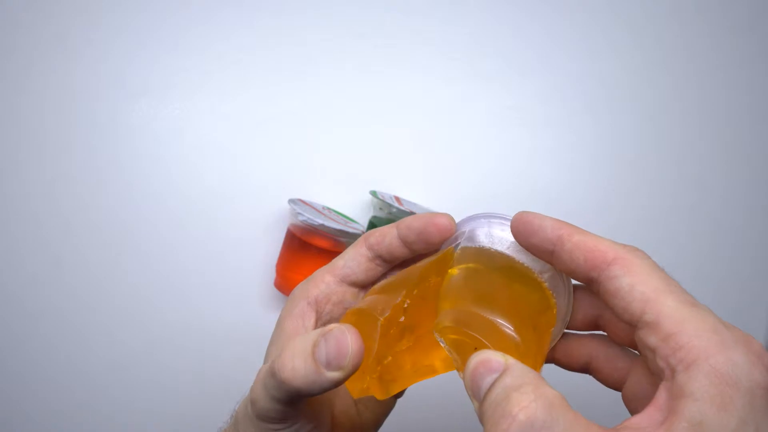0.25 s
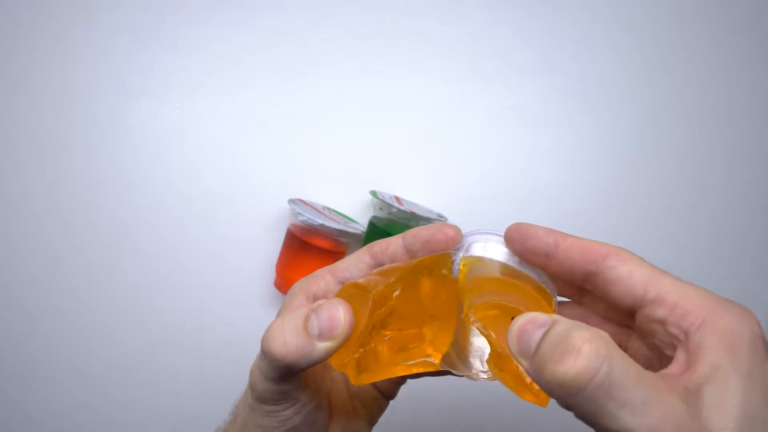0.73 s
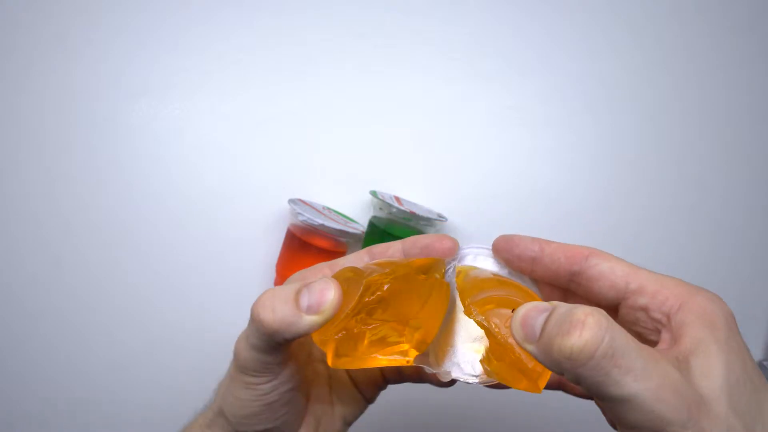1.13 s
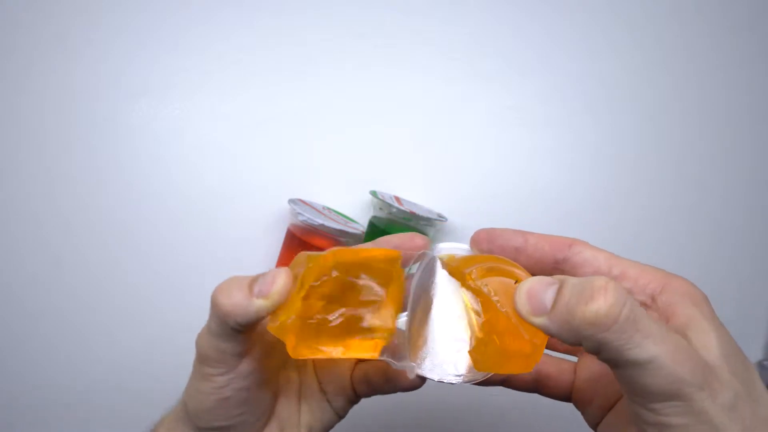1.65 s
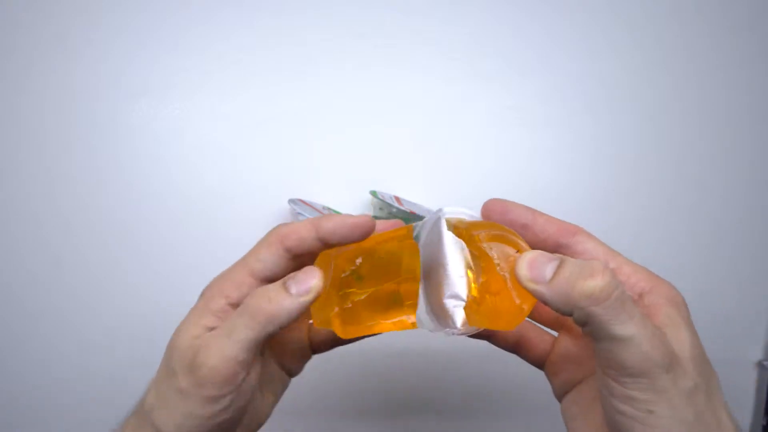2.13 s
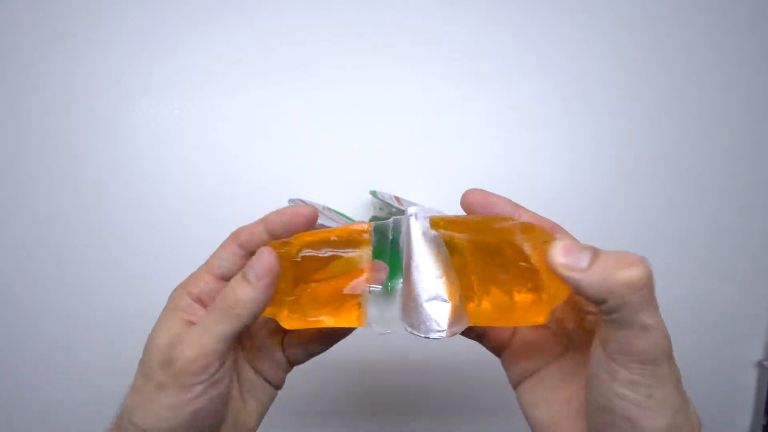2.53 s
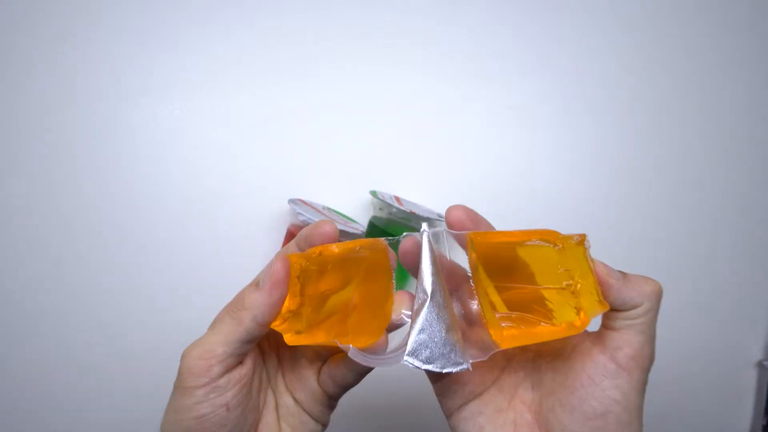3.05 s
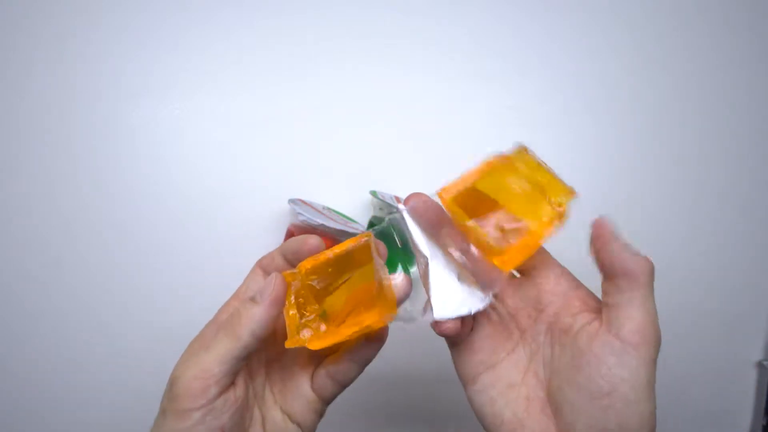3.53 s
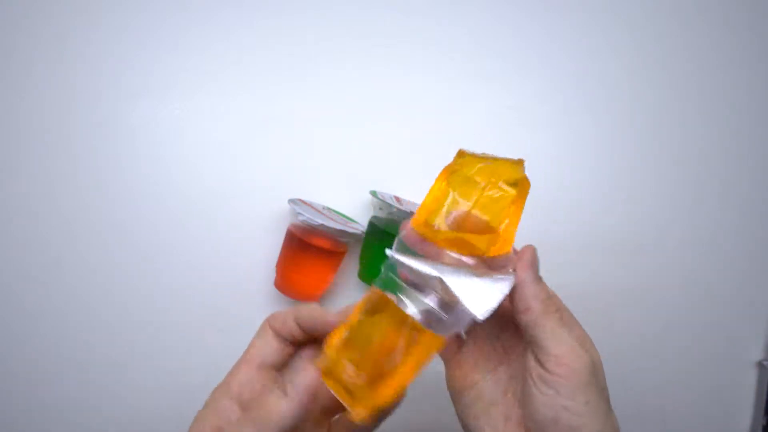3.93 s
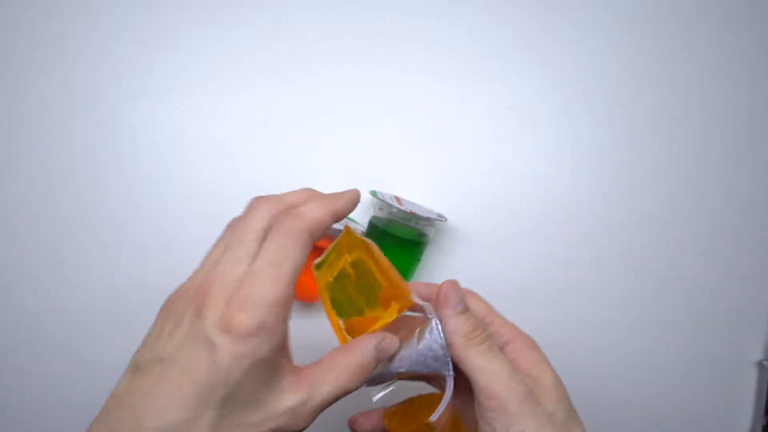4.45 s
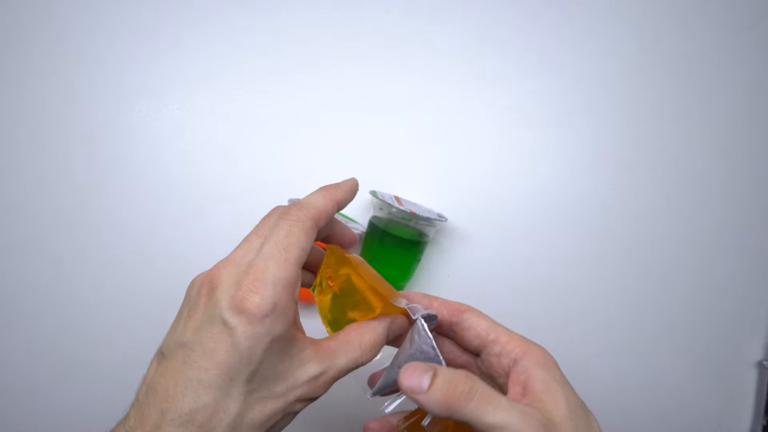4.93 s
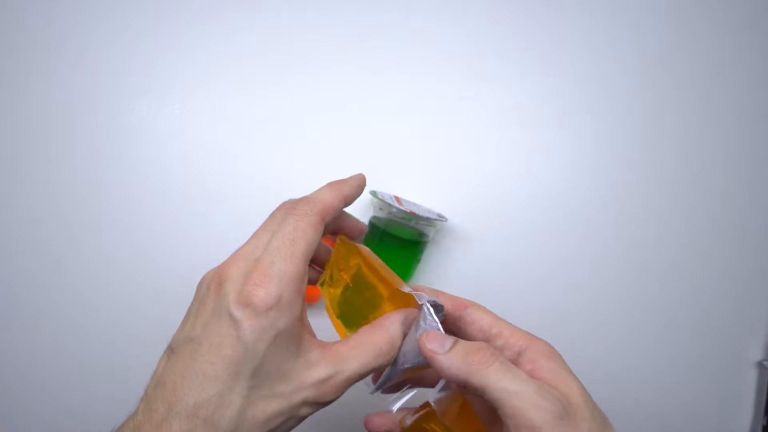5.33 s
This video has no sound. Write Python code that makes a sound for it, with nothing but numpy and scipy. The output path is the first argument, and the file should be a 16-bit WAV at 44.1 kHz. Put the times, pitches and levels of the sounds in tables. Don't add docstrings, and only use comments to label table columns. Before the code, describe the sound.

Close, harsh plastic buckling cracks clip and distort, followed by dense foil lid rustling, small ticks and a last burst of snaps.

```python
import sys
import numpy as np
from scipy import signal
from scipy.fft import rfft, irfft
from scipy.io import wavfile
from scipy.ndimage import uniform_filter1d

SR = 44100
rng = np.random.default_rng(int(sys.argv[2]) if len(sys.argv) > 2 else 0)


def inscribe(sig):
    pcm = np.round(np.clip(np.atleast_2d(sig).T, -1, 1) * 32767)
    wavfile.write(sys.argv[1], SR, pcm.astype(np.int16))


def gain_from_db(level_db):
    decades = np.asarray(level_db, float) / 20
    return 10 ** decades


N = 246060
T = np.arange(N) / SR
SHIELD_DB = -8
PURE_DB = -42

# start_s, peak_db, pitch_hz, crack_over_ring_db, overload_db
BANGS = [
    (0.117, 13.2, 2531, 10, 14.75),
    (1.506, 14, 1994, 19, 17.1),
    (1.517, 6, 2350, 2, 20.2),
    (2.715, 6.6, 2250, 4, 2.6),
    (4.722, 9.7, 2595, 1.5, 2.6),
]
# start_s, peak_db, pitch_hz, crack_over_ring_db, overload_db
SNAPS = [(1.879, 1, 3530, -5, 0.5), (1.881, -4, 1510, -22, -4.5), (3.088, 4, 2810, 3, -14),
         (4.535, 0.5, 3420, -17, -1), (4.611, 3, 2570, -6, -10), (4.647, -8, 2060, -8, -8),
         (4.657, 5, 2386, -2, 6.5), (5.442, 5, 2417, -1.5, -4.5), (5.457, -1, 2310, -13, -4),
         (5.544, 5.5, 2240, 0, 3.5), (5.554, 6, 4230, 9.5, 7)]
# start_s, peak_db, crack_over_ring_db, overload_db
WALL_SNAPS = [(0.734, 3.5, 16, -2), (0.742, -0.5, -1, -6), (0.756, 5.5, -2, -23), (0.762, -0.5, 6, -13),
              (0.898, -7, 13, -15), (0.9, 3, 8, -4), (0.909, 2.5, -4, -7), (0.964, -4, -1, -18),
              (0.976, -8, -2, -25), (1.19, 2, 13, -8.5), (1.278, -1.5, 1, 1), (1.332, 3.5, 8, -4)]
# pitch_hz, level_db (per Hz)
CRACK = [(88, -54), (150, -121), (547, -12.5), (2330, 0), (5210, 0.5), (6090, -5.5), (8660, -3),
         (11200, -13.5), (14700, -12), (16200, -67)]


def unit(x):
    return x / np.sqrt(np.mean(x ** 2))


def colour(x, points):
    hz, db = np.transpose(points)
    bins = np.maximum(np.arange(len(x) // 2 + 1) * SR / len(x), 1)
    weight_db = np.interp(np.log(bins), np.log(hz), db)
    return irfft(rfft(x) * gain_from_db(weight_db), len(x))


def band(x, hz, width_hz):
    return signal.lfilter(*signal.iirpeak(hz, hz / width_hz, SR), x)


def walk(count, hold):
    steps = np.repeat(rng.standard_normal((count, N // hold + 1)), hold, axis=1)
    return uniform_filter1d(steps, hold, axis=1)[:, :N]


def floor():
    # pitch_hz, level_db (per Hz)
    rumble_colour = [(11, 1), (18, -2), (58, 2), (81, -14), (112, -3.5), (172, -7), (199, -8), (278, -13.5),
                     (347, -13), (400, -19), (520, -19), (880, -120)]
    # pitch_hz, level_db (per Hz)
    hiss_colour = [(240, -30), (400, 0), (801, -6), (1380, -2), (1840, -4), (2750, -4), (3470, -10),
                   (8240, -15), (13500, -20), (16000, -24)]
    wobble = gain_from_db(2 * walk(count=1, hold=2048)[0])
    rumble = unit(colour(rng.standard_normal(N), rumble_colour) * wobble)
    hiss = unit(colour(rng.standard_normal(N), hiss_colour))
    return gain_from_db(-44) * rumble + gain_from_db(-51) * hiss


def buckle_rows():
    # start_s, peak_db, crack_over_ring_db
    wall_ticks = [(0.454, -24, 0), (0.65, -13.5, 13), (0.686, -14.5, 0), (0.712, -15, 9), (0.724, -20, 14),
                  (0.77, 1, -41), (0.782, -9, -36), (0.834, -3.5, 3.5), (0.92, -14, -14), (0.93, -6, 2),
                  (0.947, 0.5, -52), (0.955, -1.5, 9), (1.122, -15.5, -5), (1.225, -3, -2),
                  (1.251, -16, -3), (1.264, -18.5, -9), (1.299, -6.5, 58), (1.31, -4, 9), (1.319, -5.5, 3),
                  (1.342, -2.5, 5.5), (1.384, -18, -4)]
    # start_s, peak_db, pitch_hz, t60_s,
    # overload_db
    hums = [
        (2.715, -9, 1410, 0.11, -1.5),
        (2.715, -11, 1870, 0.037, -0.5),
        (3.84, -13.5, 2032, 0.14, -19),
        (4.723, -11.5, 1410, 0.07, 14),
    ]
    # start_s, peak_db, pitch_hz,
    # t60_s
    pops = [(1.114, -20, 790, 0.017), (1.433, -3.5, 1050, 0.023), (1.675, -7.5, 1170, 0.045),
            (1.746, -8, 840, 0.031), (1.85, -3.5, 932, 0.035), (1.864, -20.5, 546, 0.13),
            (2.572, -25, 553, 0.048), (2.59, -8, 1140, 0.045), (3.839, -26.5, 540, 0.27),
            (4.55, -27, 527, 0.21), (4.61, -18.5, 608, 0.17), (4.644, -16, 1042, 0.19)]
    # start_s, peak_db, pitch_hz, crack_over_ring_db
    turn_ticks = [(0.936, -2.5, 1100, -25), (1.81, -14, 2220, -1), (2.018, -19, 2450, 38),
                  (2.113, -19.5, 600, 6), (2.135, -23.5, 613, -3), (2.221, -25.5, 710, -3),
                  (2.372, -17.5, 1190, -8), (2.629, -19.5, 1170, -3), (2.791, -13.5, 1680, 1),
                  (2.864, -20, 1290, 5), (3.006, -15.5, 2380, 2), (3.15, -24, 2750, -26),
                  (3.5, -22, 1440, -31), (3.798, -20, 3040, -10), (3.828, -7.5, 4920, -10),
                  (3.826, -36, 1464, -15), (3.84, -26, 2150, 1), (4.043, -20.5, 735, 9),
                  (4.179, -22.5, 2220, -17), (4.204, -19.5, 2450, 5), (4.213, -18.5, 1580, -11),
                  (4.281, -21.5, 1580, -11), (4.676, -5, 2100, -21), (4.809, -9.5, 1320, 9),
                  (5.179, -30.5, 2350, -2), (5.415, -24, 2410, -14)]
    # start_s, peak_db, pitch_hz
    thin_ticks = [(0.0518, -32.5, 8300), (1.7304, -12, 3000), (2.647, -28, 7660), (2.6687, -31, 3220),
                  (2.69, -23, 4500), (4.966, -28, 8200), (5.0724, -36, 4500), (5.1174, -29.5, 11250),
                  (5.3194, -41, 4630)]

    def ring_t60(crack_db):
        return min(0.033 * 2 ** (crack_db / 24.5), 0.04)

    wall = list(WALL_SNAPS) + [(*row, SHIELD_DB) for row in wall_ticks]
    wall_hz = 1606 * (1 + 0.025 * rng.standard_normal(len(wall)))
    snaps = [(s, db, hz, crack_db, over_db) for (s, db, crack_db, over_db), hz in zip(wall, wall_hz)]
    snaps += list(SNAPS)
    rows = [(s, db, hz, crack_db, ring_t60(crack_db), over_db) for s, db, hz, crack_db, over_db in snaps]
    rows += [(s, db, hz, crack_db, 0.021, over_db) for s, db, hz, crack_db, over_db in BANGS]
    rows += [(s, db, hz, PURE_DB, t60, over_db) for s, db, hz, t60, over_db in hums]
    rows += [(s, db, hz, -36, t60, SHIELD_DB) for s, db, hz, t60 in pops]
    rows += [(*row, 0.022, SHIELD_DB) for row in turn_ticks]
    rows += [(*row, -18, 0.0048, SHIELD_DB) for row in thin_ticks]
    return rows


def buckle(hz, crack_db, t60, chance, click):
    t = T[:len(chance)]
    pure = crack_db < PURE_DB + 1
    fall = np.log(1000) * t / max(t60, 0.004)
    ring = np.sin(2 * np.pi * hz * t) * np.exp(-fall)
    apart = 0.025 if pure else 0.088
    neighbour_hz = hz * (1 + apart * chance[0])
    ring += 0.5 * np.sin(2 * np.pi * neighbour_hz * t + chance[1]) * np.exp(-0.85 * fall)
    carried = ring * (1 if pure else 1.32 * np.exp(-t / 0.0014))
    for k, ratio in enumerate((0.55, 0.72, 1.45, 1.9, 2.5)):
        stray_hz = min(hz * ratio * (1 + 0.081 * chance[2 + k]), 0.35 * SR)
        stray_db = -8 + 0.2 * max(crack_db, -20) + 2.5 * chance[7 + k]
        ring += gain_from_db(stray_db) * np.sin(2 * np.pi * stray_hz * t) * np.exp(-t / 0.002)
    crack_fade = np.exp(-t / 0.0006) + 0.3 * np.exp(-t / 0.0035)
    crack = gain_from_db(crack_db) * unit(colour(chance, CRACK)) * crack_fade
    near = (ring + crack) * (1 - np.exp(-t / 0.0001))
    far = 0.75 * carried + 0.078 * ring + click * np.sqrt(np.sum(crack ** 2))
    return np.array([near, far]) / np.abs(near).max()


def cups():
    # start_s, peak_db, push_s
    puff_rows = [
        (0.116, -25, 0.0011),
        (1.506, -6, 0.00086),
        (2.715, -6, 0.00057),
        (4.721, -20, 0.0011),
    ]
    rows = buckle_rows()
    size = 6144
    heard, true, puffs = np.zeros((3, N + size))
    click = np.roll(colour(1. * (T[:size] == 0), CRACK), 64)
    click = colour(click, [(650, -14), (1250, 0)])
    click /= np.sqrt(np.sum(click ** 2))
    chances = rng.standard_normal((len(rows), size))
    for (s, db, hz, crack_db, t60, over_db), chance in zip(rows, chances):
        i = int(s * SR)
        near, far = gain_from_db(db) * buckle(hz, crack_db, t60, chance, click)
        heard[i:i + size] += near
        true[i:i + size] += gain_from_db(over_db) * far
    for s, db, push_s in puff_rows:
        i = int(s * SR)
        age = T[:size] / push_s
        puffs[i:i + size] += gain_from_db(db) * age * np.exp(1 - age) * (1 - age / 2)
    no_bass = signal.butter(2, 330, "high", fs=SR, output="sos")
    thin = signal.sosfilt(no_bass, heard)
    return (thin + puffs)[:N], true[:N]


def room(x):
    # pitch_hz, start_db, t60_s
    tail_bands = [(350, -52.5, 0.32), (530, -49, 0.35), (1260, -42, 0.34), (2450, -47, 0.4),
                  (3860, -49.5, 0.32), (6170, -45, 0.34), (10000, -47.5, 0.29), (14000, -44, 0.26)]
    # delay_s, level_db
    echoes = [(.0031, -22), (.0118, -23), (.0152, -28), (.026, -32)]
    t = T[:SR // 2 + SR // 4]
    tail = np.zeros(len(t))
    for hz, db, t60 in tail_bands:
        edges = signal.butter(2, [hz / 1.35, hz * 1.35], "band", fs=SR, output="sos")
        noise = unit(signal.sosfilt(edges, rng.standard_normal(len(t))))
        tail += gain_from_db(db) * noise * np.exp(-np.log(1000) * t / t60)
    tail *= 1 - np.exp(-(t / 0.0027) ** 2)
    for s, db in echoes:
        i = int(s * SR)
        scatter = rng.standard_normal(256) * np.exp(-t[:256] / 0.0012)
        tail[i:i + 256] += gain_from_db(db) * scatter / np.sqrt(np.sum(scatter ** 2))
    return signal.fftconvolve(x, tail)[:N]


def gain_db():
    attack_s, release_s, release_bend = 0.0051, 0.035, 0.84
    squash = 2.53
    out = np.zeros(N)
    for s, *_, over_db in [*BANGS, *SNAPS, *WALL_SNAPS]:
        age = np.maximum(T - s, 0)
        dive = (1 - np.exp(-age / attack_s)) * np.exp(-(age / release_s) ** release_bend)
        out = np.minimum(out, -squash * max(over_db, 0) * dive)
    return out


def patches(creases, modes, patch_db):
    activity = gain_from_db(patch_db * walk(count=len(modes), hold=1024))
    total = np.zeros(N)
    for k, (hz, width_hz, db) in enumerate(modes):
        total += (-1) ** k * gain_from_db(db) * band(creases * activity[k], hz, width_hz)
    return unit(total)


def foil():
    # pitch_hz, width_hz, level_db
    lid_modes = [(1574, 280, 8), (2063, 340, 13), (2800, 620, 12), (3730, 42, 11.5), (3990, 190, 6),
                 (4980, 77, 4), (1510, 26, 9), (2912, 87, 19), (2366, 25, 6.5)]
    # pitch_hz, width_hz, level_db
    treble_modes = [(5700, 1600, 0), (7000, 1800, -2), (8600, 2400, -2), (11000, 3000, -6),
                    (14000, 3500, -9)]
    # loudest_s, level_db, rise_s, fall_s, treble_over_body_db
    foil_bursts = [(2.94, -35, 0.062, 0.088, -7), (3.0, -25.5, 0.069, 0.021, -24),
                   (3.075, -29.5, 0.017, 0.0035, -9), (3.098, -13.5, 0.012, 0.029, -13.5),
                   (3.156, -22.5, 0.048, 0.036, -3.5), (3.22, -32.5, 0.003, .1, 0),
                   (3.245, -19, 0.032, 0.055, -20), (3.325, -23, 0.11, 0.013, -4.5),
                   (3.392, -16.5, .12, 0.052, -13), (3.44, -23, 0.067, 0.014, -12),
                   (3.501, -15, 0.0013, 0.061, -27), (3.535, -40, 0.016, .06, -18),
                   (3.609, -18, 0.11, 0.021, -9), (3.756, -33, 0.007, 0.18, -32),
                   (3.826, -13.5, 0.022, 0.023, -6), (3.85, -18.5, 0.076, 0.014, -6),
                   (4.085, -29.5, 0.045, 0.024, -9), (4.138, -34, 0.11, 0.063, -5.5),
                   (4.237, -29, 0.028, 0.071, -13), (4.318, -33.5, 0.0078, 0.028, -20),
                   (4.405, -49, .04, 0.013, -17),
                   (0.482, -34, .023, 0.005, -7.5), (0.951, -25, .02, 0.076, 8), (0.975, -25, 0.025, 0.0091, 15.5),
            (2.02, -32.5, 0.008, 0.015, 3.5), (2.16, -43, 0.045, 0.026, -25),
            (2.369, -44.5, 0.0035, 0.039, -1), (4.536, -12, 0.0028, 0.096, -5.5),
            (4.557, -12.5, 0.025, 0.12, -20), (4.598, -28, .03, .004, -18),
            (4.652, -13.5, 0.056, 0.0083, -10), (4.68, -22, 0.027, 0.023, -29),
            (4.713, -19.5, 0.11, 0.0078, -11), (5.004, -46, 0.092, 0.016, -14),
            (5.065, -48, .03, 0.016, -14), (5.289, -44, 0.02, 0.05, -19), (5.364, -27, 0.0031, 0.026, 0.5),
            (5.381, -24.5, 0.023, 0.012, -10), (5.467, -17, 0.0043, 0.13, -39)]
    creases_per_s, spread_db, clump_db, patch_db = 9000, 2.4, 2, 5.5

    happens = rng.random(N) < creases_per_s / SR
    crease_size = gain_from_db(spread_db * np.minimum(rng.exponential(size=N), 5))
    creases = happens * crease_size * np.sign(rng.standard_normal(N))
    creases = creases * gain_from_db(clump_db * walk(count=1, hold=128)[0])

    broad = band(band(creases, 2160, 4600), 2160, 4600)
    body = patches(creases, lid_modes, patch_db)
    body = unit(body + 0.24 * unit(broad) + 0.05 * unit(band(creases, 600, 500)))

    smear = rng.standard_normal(N) * uniform_filter1d(np.abs(creases), 48)
    spit = patches(smear, treble_modes, patch_db)
    spit = unit(spit - band(spit, 1000, 2300))

    body_power, treble_power = np.zeros(N), np.zeros(N)
    for s, db, rise_s, fall_s, treble_db in foil_bursts:
        at = slice(max(int((s - 3 * rise_s) * SR), 0), int((s + 3 * fall_s) * SR))
        away = np.maximum((s - T[at]) / rise_s, (T[at] - s) / fall_s)
        power = gain_from_db(2 * db - 40 * away ** 1.023)
        body_power[at] += power
        treble_power[at] += power * gain_from_db(2 * treble_db)
    return np.sqrt(body_power) * body + np.sqrt(treble_power) * spit


def scene():
    background = floor()
    heard, true = cups()
    lid = foil()
    echo = room(true + gain_from_db(SHIELD_DB) * lid)
    return (heard + lid + gain_from_db(gain_db()) * (echo + background))[None]


def roll_off(x):
    return signal.sosfilt(signal.butter(12, 16370, fs=SR, output="sos"), x)


def record(dry):
    low_pass = signal.ellip(8, 0.2, 40, 15900, fs=SR, output="sos")
    dull = signal.sosfilt(low_pass, dry)
    return roll_off(np.clip(dull, -1, 1))


dry = scene()
out = record(dry)
inscribe(out)
```